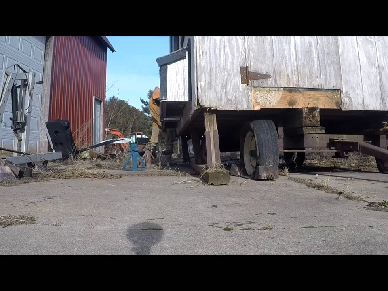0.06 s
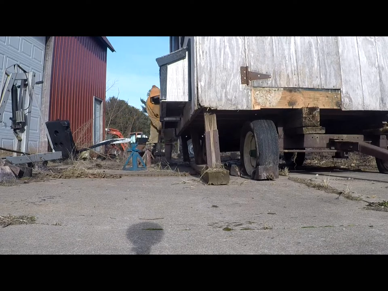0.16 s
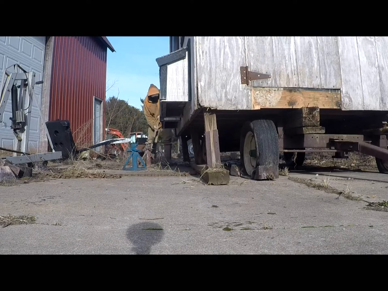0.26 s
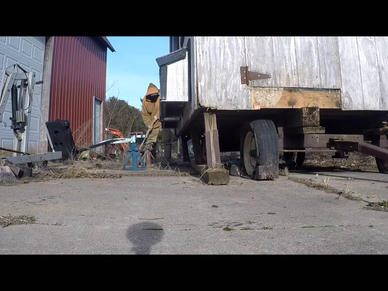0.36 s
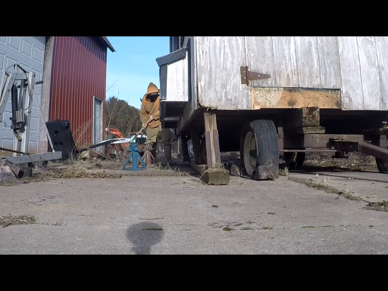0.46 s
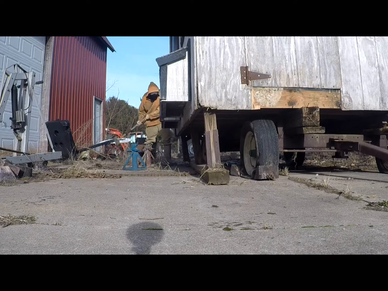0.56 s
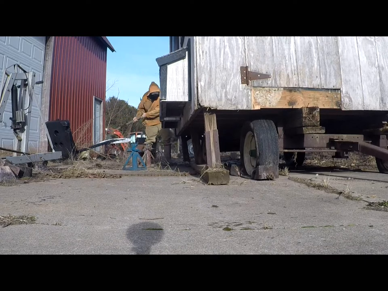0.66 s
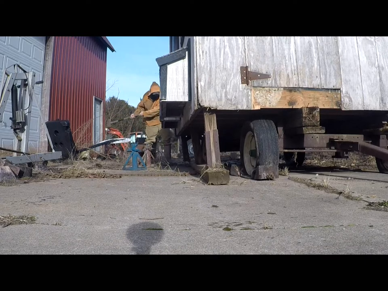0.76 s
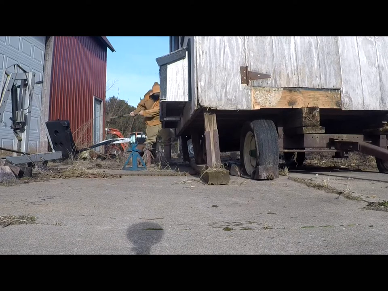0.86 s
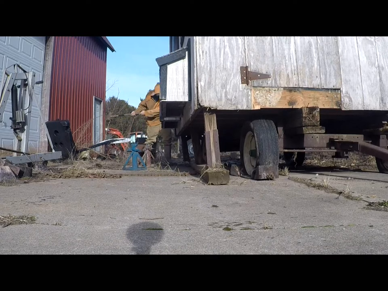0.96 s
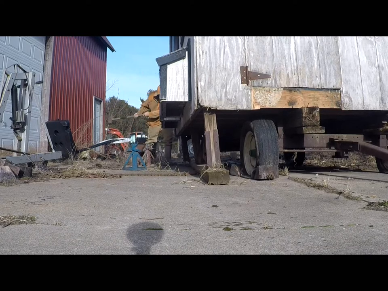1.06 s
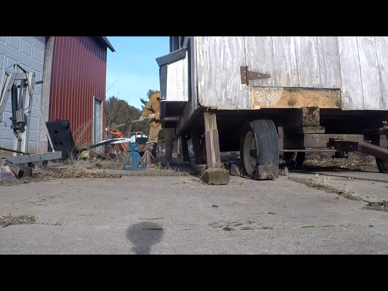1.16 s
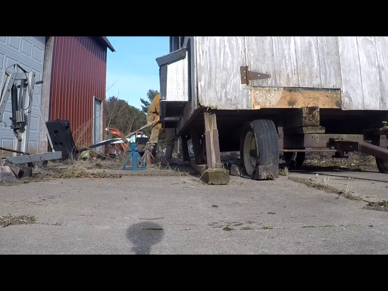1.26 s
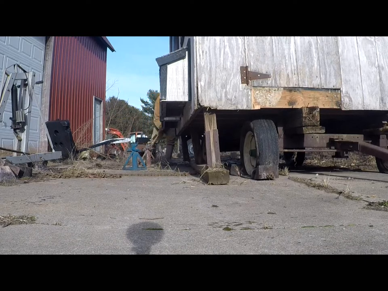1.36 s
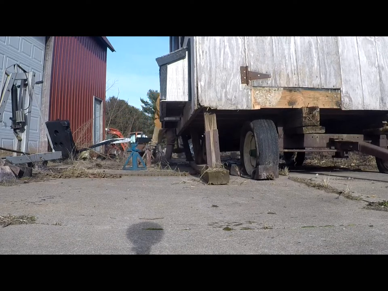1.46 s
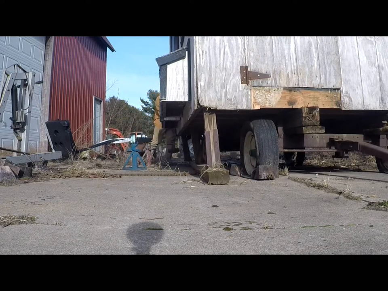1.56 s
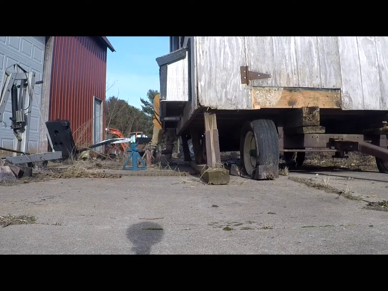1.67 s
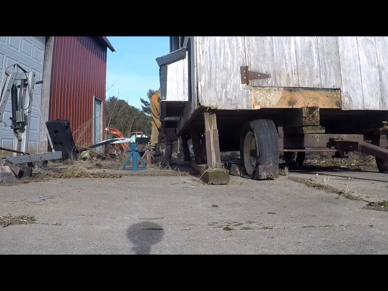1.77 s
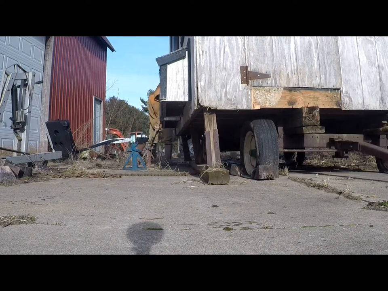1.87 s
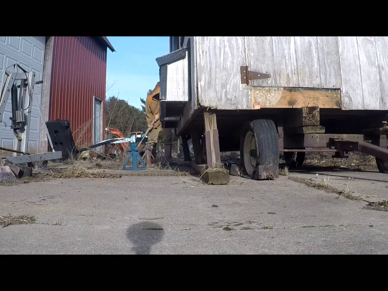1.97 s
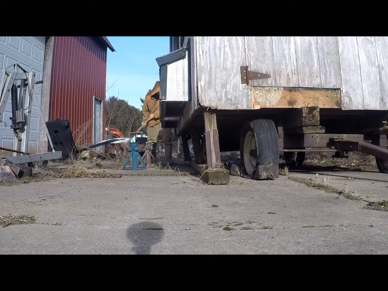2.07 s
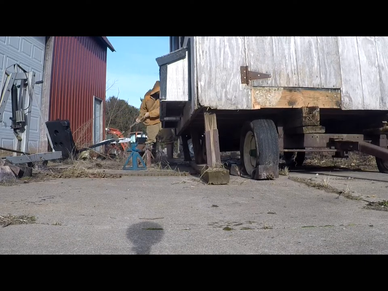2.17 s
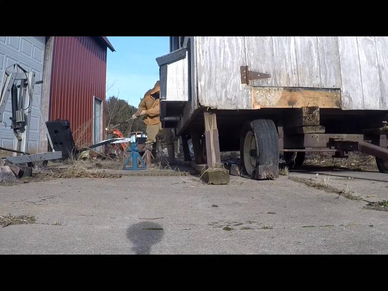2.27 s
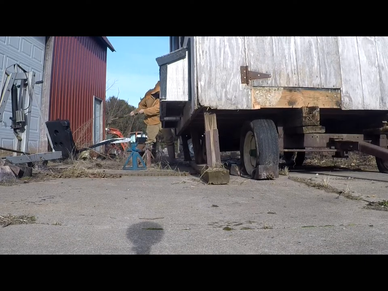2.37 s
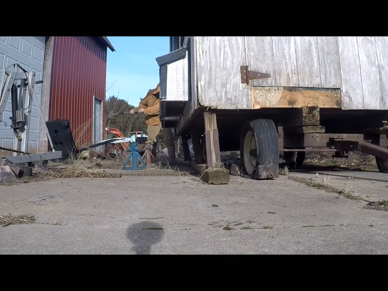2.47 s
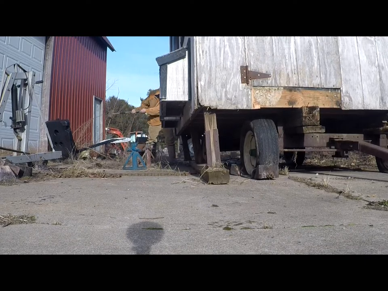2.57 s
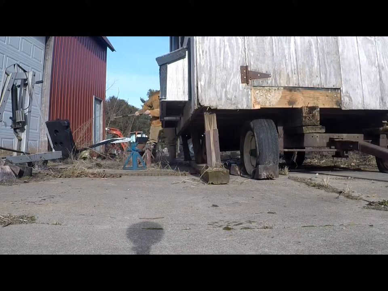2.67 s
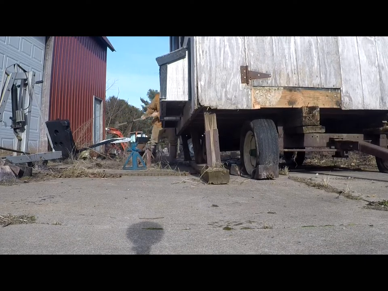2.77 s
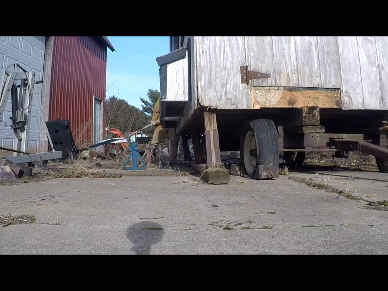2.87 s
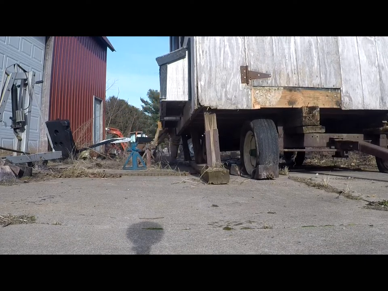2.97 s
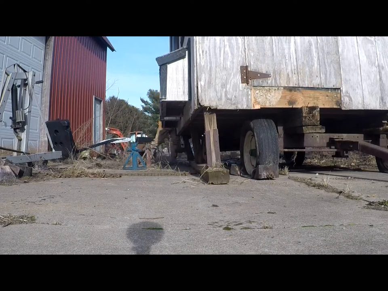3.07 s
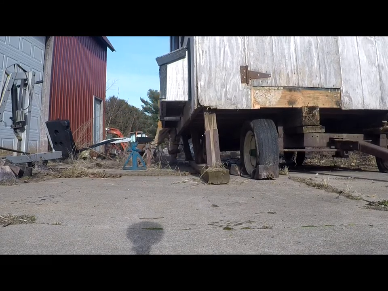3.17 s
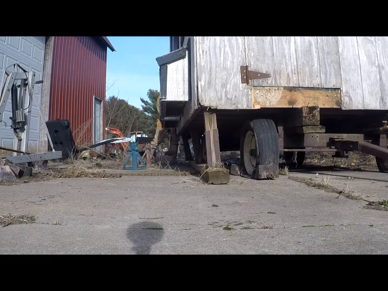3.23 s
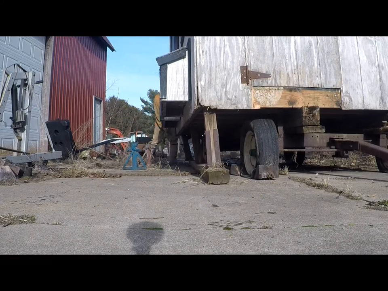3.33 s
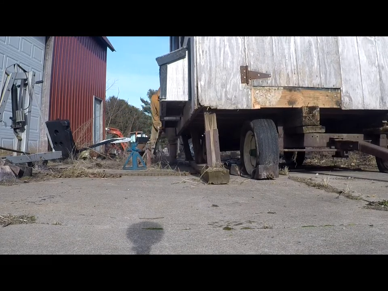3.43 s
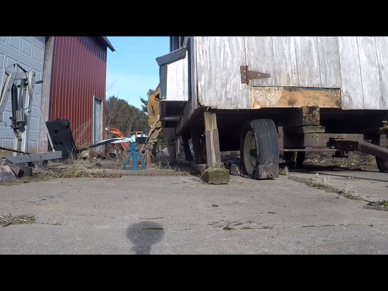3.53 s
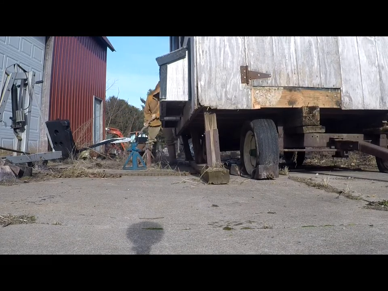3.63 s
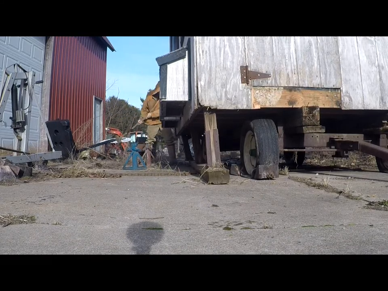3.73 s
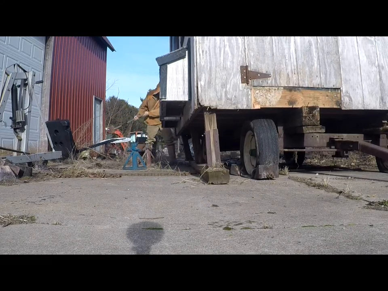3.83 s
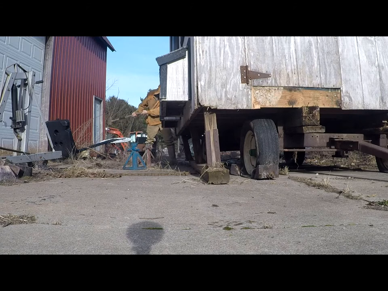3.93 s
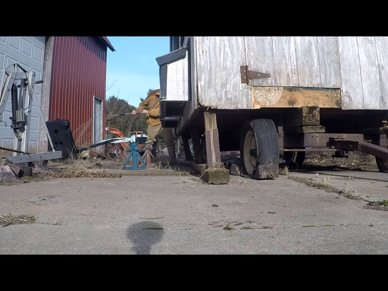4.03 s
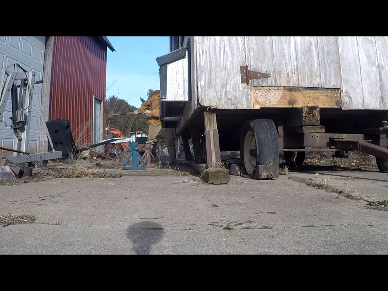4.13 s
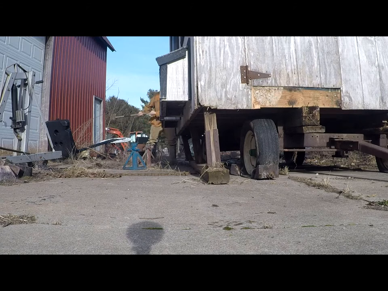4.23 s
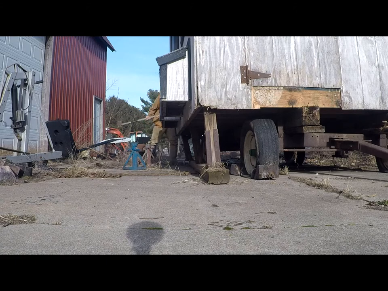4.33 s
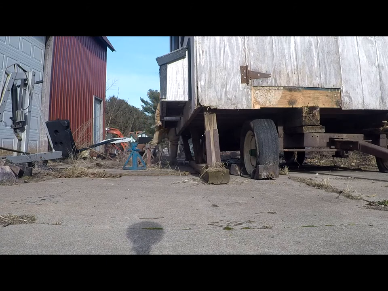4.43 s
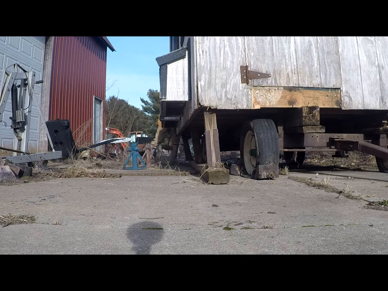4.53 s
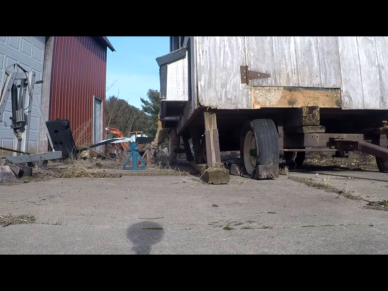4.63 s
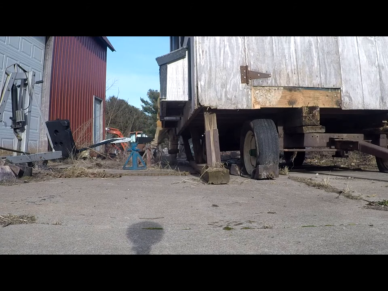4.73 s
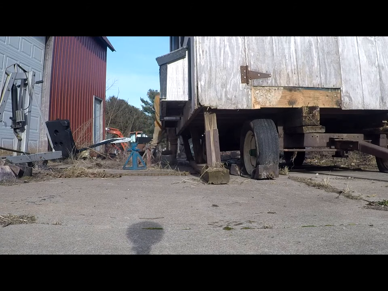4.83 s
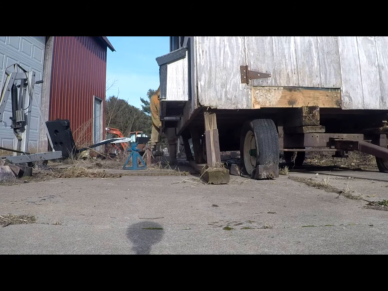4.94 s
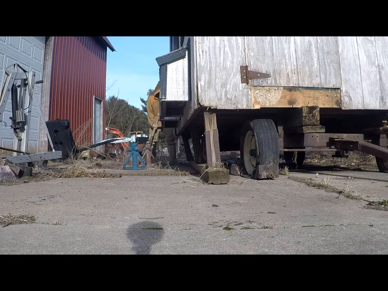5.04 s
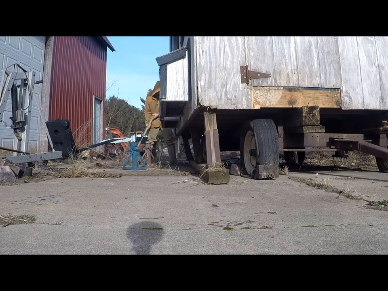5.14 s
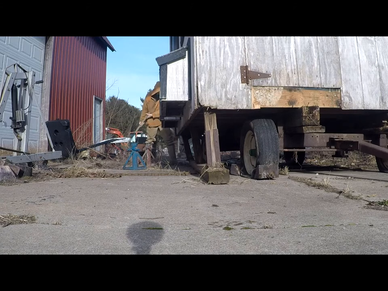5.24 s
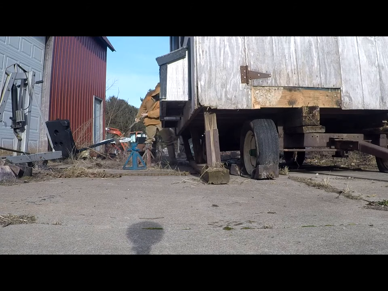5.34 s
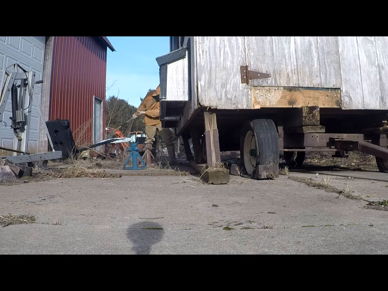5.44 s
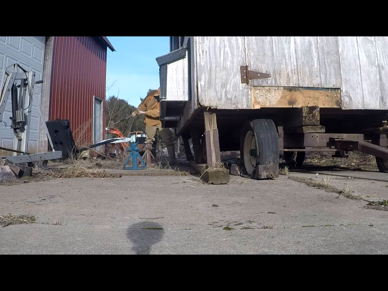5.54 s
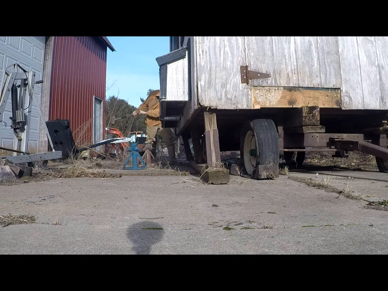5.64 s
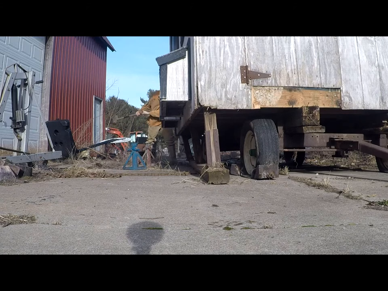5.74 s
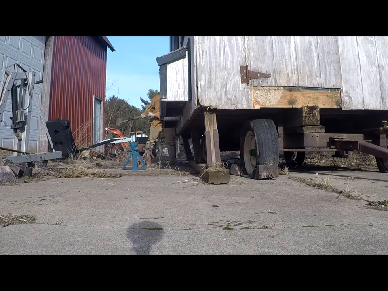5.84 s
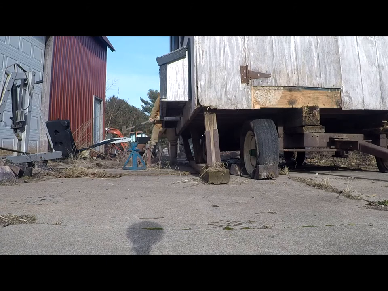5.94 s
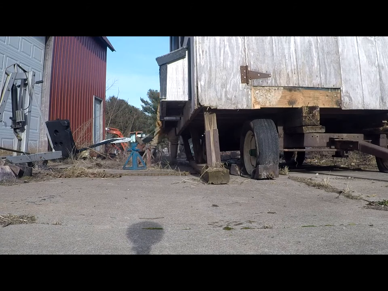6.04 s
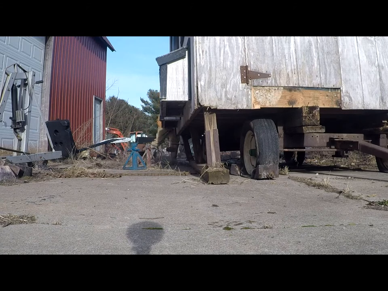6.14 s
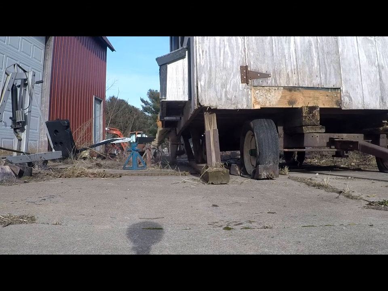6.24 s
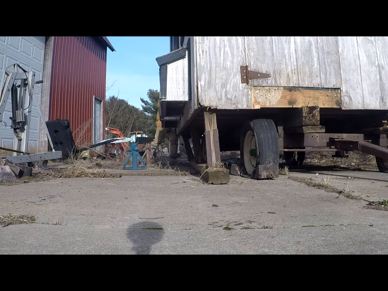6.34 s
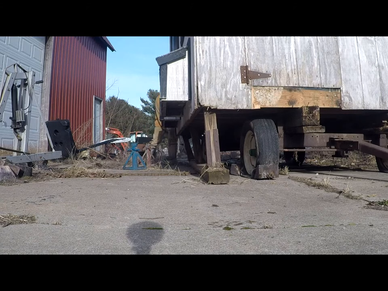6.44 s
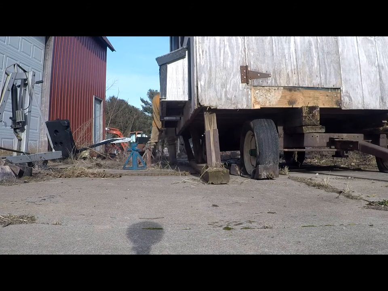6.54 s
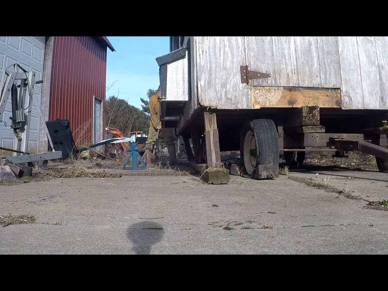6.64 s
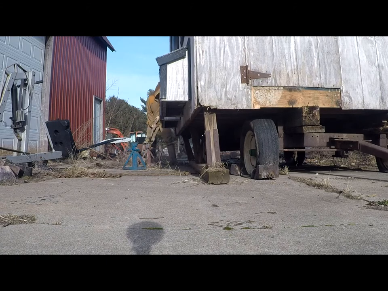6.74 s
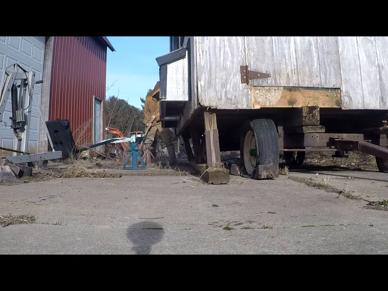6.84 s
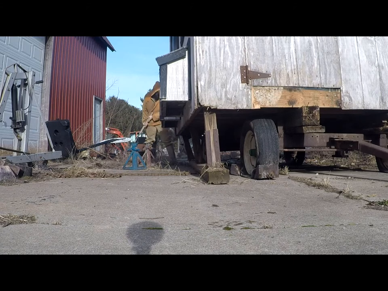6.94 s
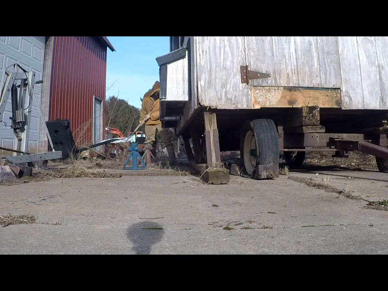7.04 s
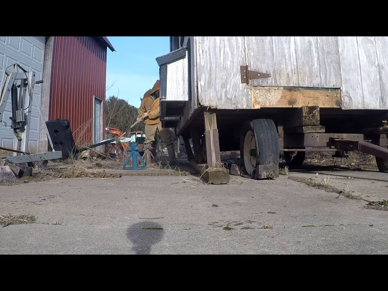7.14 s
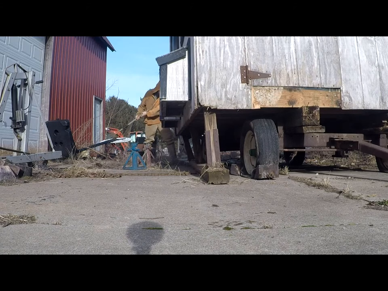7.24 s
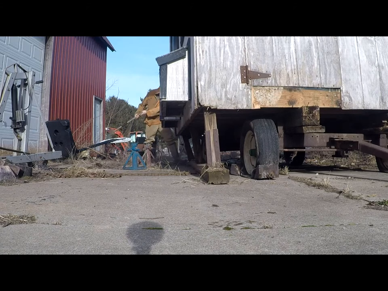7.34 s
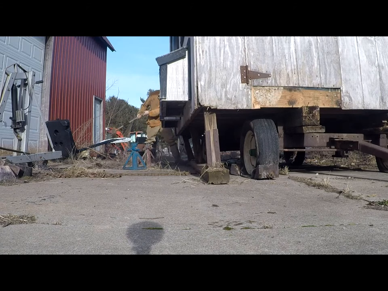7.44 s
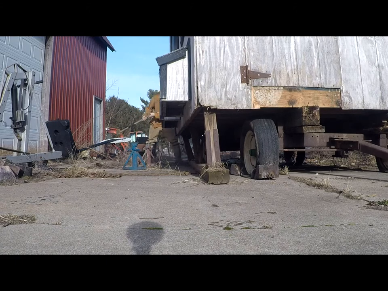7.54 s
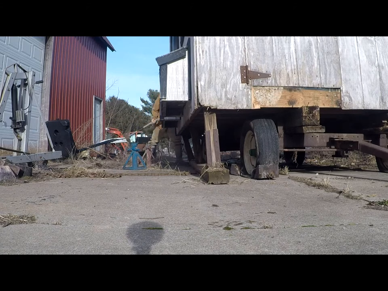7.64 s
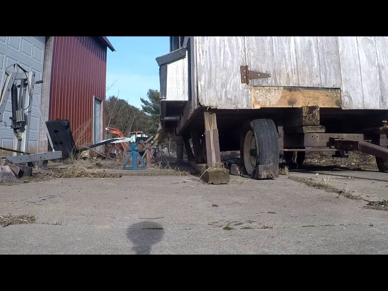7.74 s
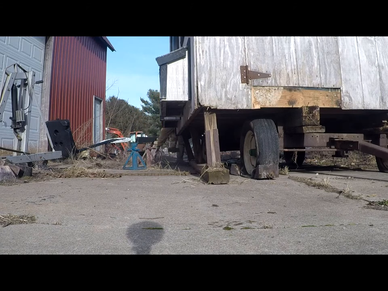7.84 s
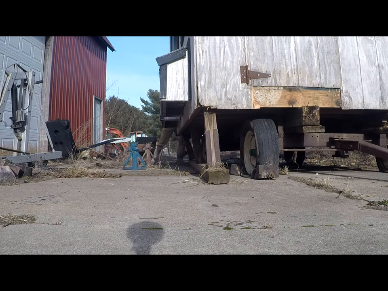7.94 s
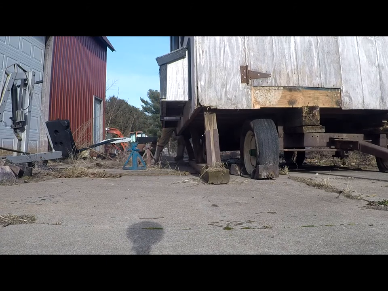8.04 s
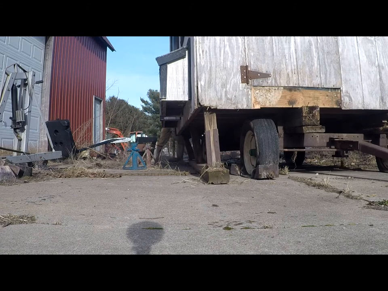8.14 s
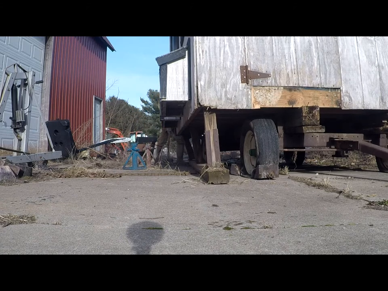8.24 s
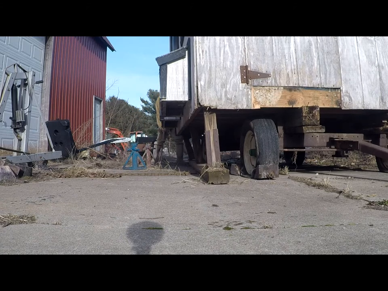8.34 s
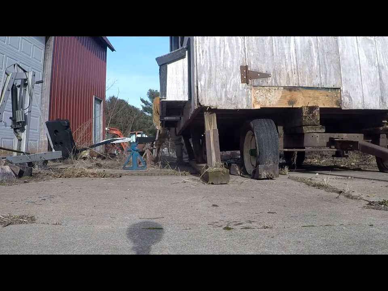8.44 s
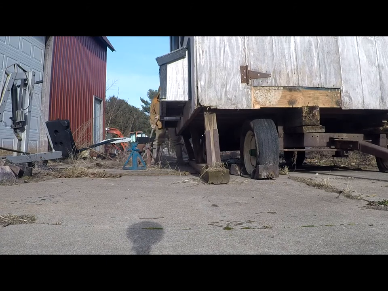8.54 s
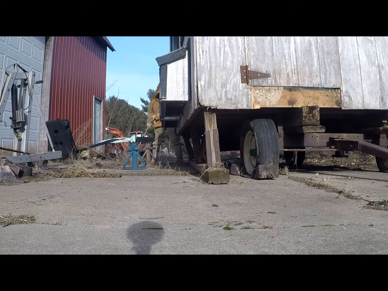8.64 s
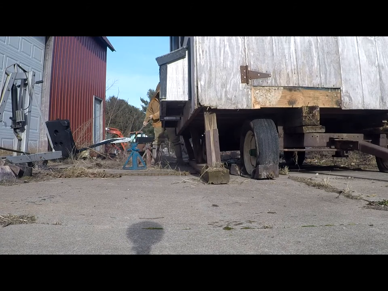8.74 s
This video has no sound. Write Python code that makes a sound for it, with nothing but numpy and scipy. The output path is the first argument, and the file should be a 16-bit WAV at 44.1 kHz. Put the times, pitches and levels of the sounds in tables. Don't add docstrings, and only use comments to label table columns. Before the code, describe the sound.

Heavy steel clanks crack and boom on timber every 1.6 seconds, very close and overloaded, with scuffs, ticks and wind between them in an open yard.

```python
import sys
import numpy as np
from scipy import signal
from scipy.io import wavfile

SR = 44100
rng = np.random.default_rng(int(sys.argv[2]) if len(sys.argv) > 2 else 0)


def boost(x):
    u = np.asarray(x, float) / 20
    return 10 ** u


def generate_wav(signal):
    frames = np.transpose(np.atleast_2d(signal))
    scaled = np.clip(frames, -1, 1) * 32767
    pcm = np.round(scaled).astype(np.int16)
    wavfile.write(sys.argv[1], SR, pcm)


N = 388080

# start in seconds, strength in dB, brightness in dB, board boom in dB, clang in dB
BLOWS = [
    (-.045, 2, -1, -5.5, -7),
    (1.544, 2, 1, 0, -1),
    (3.1268, 2.5, 0, -1.5, -1.5),
    (4.6518, 3, -1.5, -3, -1.5),
    (6.2443, 1.5, -2, 0.5, 1),
    (7.945, 3, -0.5, 1.5, -1.5),
]
# pitch in Hz, level in dB, decay by 60 dB in seconds
TIMBER_MODES = [(65.8, -9, 0.19), (97.2, -13, 0.19), (122.4, -9.5, 0.14), (161, -7.5, 0.2),
                (188.4, -8, 0.16), (220.1, -3.5, 0.3), (254, -11, 0.34), (287.2, 2.5, 0.2),
                (304.9, -1, 0.22), (342, -3.5, 0.16), (460.6, -8, 0.19), (587, -9.5, 0.21),
                (684, -10.5, 0.21), (821, -11.5, 0.22), (937, -10, 0.21), (1013, -14, 0.24),
                (1100, -12.5, 0.19), (1150, -14.5, 0.21), (1210, -16, 0.29), (1484, -16.5, 0.17),
                (1580, -16, 0.11), (2070, -19.5, .13), (2290, -22.5, 0.13), (2800, -18.5, 0.14),
                (4070, -23, 0.13), (4910, -23.5, 0.081), (6000, -25.5, 0.059)]
# pitch in Hz, level in dB per Hz
CRASH_COLOUR = [(18, -43), (30, -21), (153, -5.5), (303, -2), (394, -8), (449, -7.5), (962, -11.5),
                (1460, -15), (2230, -22), (3770, -27), (8080, -31.5), (14000, -51.5), (16000, -57)]
# pitch in Hz, decay by 60 dB in seconds
CRASH_T60 = [(60, 0.34), (160, 0.25), (420, 0.19), (1100, 0.14), (2910, 0.24), (7680, 0.17)]
LANDING_LOW_HZ = [65, 120, 160, 220, 290]
LANDING_HIGH_HZ = [350, 520, 1000, 2000, 9000]
# one blow, its gains in dB at the low and at the high pitches
LANDING_LOW_DB = [(-3, 1, 2, 4, 3), (-1, 3.5, -1, 2, -2), (4, 8, 3, 4, 0), (6, 1.5, -1.5, 1, 0),
                  (-4, 6, 0, 1, -2.5), (-2.5, -.5, -3, 0, -1)]
LANDING_HIGH_DB = [(0.5, -2.5, -1.5, -1, 1), (8, 2.5, -3, 0, 1), (1, -1, 3, -3, 2), (2, -1, -1.5, 2.5, 0),
                   (0, 0, -1, 0, 1), (3, -2, -.5, -4, 1.5)]
THUD_DB = [-8, -9, -10, -5.5, -8, -8]
# delay in seconds, level in dB
WALL_ECHOES = [(.0045, -5.5), (.0105, -13), (.0225, -11), (0.038, -23.5)]
# pitch in Hz, decay by 60 dB in seconds, beat in Hz
BAR_HZ = [7488, 11770]
BAR_T60_S = [2.5, 1.0]
BAR_BEAT_HZ = [9, 14]
# low mode in dB, high mode in dB
BAR_DB = [(-72, -66), (-69, -64), (-64, -95), (-73, -95), (-74, -95), (-62, -95)]
# start in seconds, level in dB, bright contact in dB
PIN_BOUNCES = [
    (4.740, -26, -2),
    (4.763, -40, -20),
    (4.808, -37, -5),
    (4.861, -41.5, -17),
    (5.115, -55, -15),
    (5.320, -53, -15),
    (5.528, -64, -15),
]
PIN_LANDS_ON = [0, 0, 1, 2, 3, 4, 4]
# pitch in Hz, level in dB, decay by 60 dB in seconds
PIN_FACES = [
    [(3060, -9, 0.087), (3640, -16, 0.09), (4603, 1.5, 0.1), (4570, -6, .15), (1900, -10, .2),
     (6500, -14, 0.088), (8680, 2, 0.041), (8850, -7, .18), (12150, -5, 0.13), (13900, -12, .07)],
    [(2299, -2, 0.15), (2550, 2, 0.06), (3122, -6, .07), (8550, -10, 0.096), (10800, -18, .05),
     (12110, -16, .1), (13900, -15, 0.08)],
    [(2740, -8, 0.5), (2747, -11, .4), (3440, -5, 0.15), (3830, -5, .06), (4161, -7, 0.2), (5405, -2, 0.12)],
    [(3120, -5, .25), (4597, -3, .1), (2100, -4, .06)],
    [(13950, 7, .08)],
]
# start in seconds, peak in dB, pitch in Hz
SCUFFS = [(2.095, -37.5, 385), (3.389, -46.5, 650), (3.595, -41.5, 299), (3.679, -39, 503),
          (3.895, -36, 430), (4.925, -38.5, 646), (4.999, -44.5, 1220), (5.18, -48, 1100),
          (5.06, -39.5, 630), (5.179, -51.5, 280), (5.268, -33.5, 397), (5.425, -29.5, 406),
          (6.759, -43, 479), (6.828, -33.5, 347), (7.029, -39, 444), (8.501, -37.5, 630), (8.63, -36, 520)]
# start in seconds, peak in dB, pitch in Hz
SCRAPES = [(2.975, -36, 3035), (6.845, -50, 2980), (7.72, -35.5, 2400), (7.78, -38.5, 2370)]
# start in seconds, peak in dB, pitch in Hz
SQUEAKS = [(2.985, -36, 3200), (4.532, -46, 3160), (5.588, -52, 3130), (7.285, -46, 1990),
           (7.308, -46, 2900), (7.491, -38.5, 2960), (7.762, -38.5, 3190), (8.586, -56, 3120)]
# start in seconds, peak in dB, note in Hz
TWIGS = [(2.1634, -45, 2280), (2.6774, -34, 2400), (2.706, -38, 2840), (2.226, -40, 3800),
         (2.3197, -36, 3000), (2.335, -42, 2900), (2.614, -40, 5500), (5.455, -41, 3300),
         (6.735, -50, 3200), (2.9774, -32, 3100), (3.5494, -51, 4500), (3.665, -49, 4000),
         (4.1751, -33, 3900), (4.2632, -39, 3100), (4.5344, -44, 3140), (5.229, -42.5, 1960),
         (5.4744, -37, 4000), (5.5904, -44, 2660), (5.7668, -36.5, 2770), (6.6487, -51.5, 4500),
         (6.793, -39, 4200), (6.9195, -37, 3300), (7.0648, -46, 5430), (8.571, -44, 6000),
         (8.5877, -33, 3020), (8.6484, -44, 7800), (8.7233, -38, 4000)]
# start in seconds, peak in dB, note in Hz
GRIT = [(0.7215, -35, 5320), (1.3531, -17, 6500), (1.8408, -56, 12000), (1.9824, -52, 8280),
        (2.0762, -41, 8330), (.102, -44, 8500), (.345, -59, 12000), (.4609, -53, 8700), (.56, -52, 9200),
        (.648, -52, 8200), (1.753, -50, 11000), (2.1191, -51, 8260), (2.161, -48, 8020), (2.19, -47, 6230),
        (2.2603, -44, 7380), (2.985, -42, 7960), (3.405, -56, 8800), (3.5, -58, 8000), (3.552, -56, 8500),
        (3.62, -56, 8500), (6.872, -50, 8000), (7.3652, -40, 5960), (7.7354, -36, 8130),
        (7.7753, -39, 6070), (2.2175, -34, 8700), (2.307, -39, 9050), (2.319, -30, 7550),
        (2.3687, -40, 7000), (2.7644, -34, 7500), (3.7996, -45, 6500), (3.818, -42, 8720),
        (3.928, -44, 8000), (5.2034, -52, 8000), (5.4518, -36, 8400), (7.428, -31, 7200),
        (7.709, -33.5, 6960), (8.2816, -40.5, 9100), (8.318, -46, 3100), (8.3884, -49, 3480),
        (8.425, -38.5, 7980), (8.493, -40, 8500)]
# start in seconds, peak in dB, note in Hz
KNOCKS = [(2.26, -40, 1890), (2.9724, -35, 3120), (3.7186, -44.5, 940), (4.4758, -33, 1600),
          (4.4933, -33.5, 1810), (5.1414, -49.5, 991), (5.802, -35.5, 1850), (6.0791, -33.5, 926),
          (6.7035, -43.5, 1942), (6.7448, -38.5, 1300), (6.772, -44, 1400), (5.073, -48, 1750),
          (2.716, -40, 2900), (6.9443, -37.5, 1940), (7.734, -36.5, 1500), (8.778, -36, 1800),
          (4.1762, -37, 2600)]
# snap in dB, note in dB, woody knock in dB, bright spit in dB
TICK_KINDS = [
    (2.5, 1, -11.5, -12),
    (2.5, 1, -14.5, 0),
    (-10, 9, -7.5, -21),
]
# middle in seconds,
# length in seconds, dB over the yard, pitch in Hz
STIRS = [(0.412, 0.097, 1.5, 97.2), (0.744, 0.35, 3.5, 4200), (1.2, .25, 1, 1700), (1.252, 0.29, 5, 450),
         (2.25, 0.11, 8.5, 6000), (2.278, 0.19, 7.5, 406), (3.05, .06, 5, 90), (3.81, 0.15, 9, 400),
         (4.0, 0.16, 4.5, 280), (4.138, 0.2, 4.5, 90), (4.49, 0.099, 3.5, 1500), (4.7, 0.081, 7.5, 463),
         (5.1, 0.13, 3.5, 90), (5.306, 0.055, 9, 390), (5.3, .06, 2.5, 800), (5.4, 0.096, 4.5, 150),
         (5.42, .06, 2.5, 7000), (5.446, 0.045, 4.5, 700), (5.51, 0.099, 8.5, 310), (6.544, 0.048, 9, 540),
         (6.738, 0.06, 9, 370.4), (6.81, 0.061, 13.5, 890), (6.8, 0.066, 4.5, 6000), (7.6, 0.06, 2, 500),
         (6.95, 0.033, 8, 1800), (7.037, 0.12, 12.5, 320), (7.188, 0.078, 5.5, 258), (7.3, .06, 2.5, 300),
         (7.477, .12, 9.5, 5100), (7.6, 0.35, 2.5, 14000), (7.74, 0.044, 4, 8000), (7.8, 0.14, 7, 2210),
         (7.918, 0.041, 19.5, 442.8), (8.3, 0.12, 14.5, 6880), (8.398, .03, 6, 3020),
         (8.47, 0.059, 6, 8000), (8.52, .03, 3, 1500), (8.597, 0.087, 11.5, 430), (8.62, 0.034, 5, 3456),
         (8.78, .08, 15.5, 360)]
# start in seconds, end in seconds, first pitch in Hz, last pitch in Hz, level in dB
CHIRPS = [
    (4.077, 4.155, 5010, 4980, -54.5),
    (4.205, 4.245, 4480, 4240, -50),
]
# time in seconds, firing rate in Hz, second, half and first order in dB
ENGINE = [(0, 97, -48, -55, -37), (.17, 96, -43.5, -51, -35), (.25, 95.5, -40.5, -52, -48),
          (.4, 95, -36, -52, -31), (.55, 94, -40, -50, -45.5), (.75, 92.6, -40, -52, -42.5),
          (.95, 92.5, -45, -38, -52), (1.15, 92.5, -47, -33.5, -40), (1.5, 92, -45.5, -33.5, -45),
          (2.0, 90, -50.5, -58, -52.5), (2.6, 87, -46.5, -54, -51), (2.9, 85, -46.5, -51, -41.5),
          (3.5, 84.5, -53.5, -57.5, -49.5), (5.5, 84, -57, -62.5, -59.5), (7, 86, -56.5, -64, -55),
          (7.8, 87, -54, -58, -49.5), (8.8, 87, -55, -61, -57)]
# time in seconds, level in dB
TRAFFIC = [(0, 7.5), (.6, 10), (1.3, 11), (2.0, 5), (3.0, 5), (4.0, -1.5), (5.5, -1), (7.0, -1),
           (8.8, -0.5)]
# pitch in Hz, level in dB per Hz
YARD_COLOUR = [(15, -30), (25, -0.5), (33, -8.5), (92, -11.5), (117, -8.5), (185, -12), (326, -17),
               (695, -22), (3080, -33.5), (4740, -39), (7310, -40.5), (14800, -46.5), (16000, -62)]
YARD_EDGES_HZ = [30, 230, 700, 3000, 15500]
# open level in dB, shut by in dB, share of traffic, share of gusts
LAYERS = [
    (-45, -1.5, 0.45, 0.12),
    (-51.5, -9, 0.72, 0.0041),
    (-47, -22, 1.025, 0.),
    (-51.5, -23.5, 0.12, 0.044),
]
# time in seconds, level in dB
GUSTS = [(0.0, -44.5), (0.4, -46), (1.2, -44), (1.5, -35.5), (2.0, -48), (2.5, -41), (3.6, -52.5),
         (4.05, -33), (4.38, -32), (4.6, -45), (5.2, -41), (5.6, -29), (6.0, -30.5), (6.4, -40.5),
         (7.1, -33), (7.3, -25), (7.85, -25), (8.4, -43), (8.8, -30.5)]
# middle in seconds, peak in dB, half length in seconds
SHOVES = [(1.75, -41, .3), (3.1, -37, .06), (4.52, -38, .06), (5.3, -37, .05), (5.51, -28, .05),
          (5.62, -29, .03), (5.79, -22, .06), (5.96, -27, .06), (6.19, -27, .06), (6.48, -39, .08),
          (6.76, -32, .04), (6.93, -32, .035), (7.12, -31, .05), (7.34, -21, .05), (7.49, -16.5, .07),
          (7.84, -20, .1), (8.74, -23, .05)]
# middle in seconds, peak in dB, half length in seconds
SUCKS = [(.95, -37, .1), (1.44, -29, .13), (2.58, -32, .15), (4.14, -26, .1), (4.35, -27, .1),
         (5.17, -31, .09), (5.42, -24, .04), (5.67, -30, .03), (6.07, -34, .04), (6.65, -27, .06),
         (6.85, -29, .035), (7.02, -30, .035), (7.24, -22, .04), (7.64, -22, .05), (8.14, -35, .1),
         (8.52, -28, .07)]

TAIL = 1.01
HEAVE_HZ, HEAVE_DB, HEAVE_T60_S = 29, -21, .35
CLANG_SPREAD_DB, FLICKER_DB, STIR_OCTAVES = 2.5, 1.2, 1
SQUEAK_RISE_S, SQUEAK_T60_S, SQUEAK_SAG = 0.0024, 0.12, 2.2
TICK_CLICK_DB, TICK_PURE_DB = 5, -13
DUCK_DB, DUCK_BACK_S, DUCK_AHEAD_S, DUCK_FALL_S = -18, 0.061, .018, .007
SHUT_S, CREEP_S, SHUT_AT_ONCE = .36, 0.45, 0.94
OVERLOAD_TOP, CUTOFF_HZ = 0.94, 15800


def at_hz(points, hz):
    points_hz, values = np.array(points)[:, 0], np.array(points)[:, 1]
    return np.interp(np.log(hz), np.log(points_hz), values)


def in_time(rows):
    s, *columns = np.transpose(rows)
    return [np.interp(np.arange(N) / SR, s, column) for column in columns]


def rms_one(x):
    return x / np.sqrt(np.mean(x ** 2) + 1e-20)


def band(x, low_hz, high_hz):
    sos = signal.butter(2, [low_hz, min(high_hz, .45 * SR)], "band", fs=SR, output="sos")
    return signal.sosfilt(sos, x)


def drift(rate_hz):
    knots = rng.standard_normal(int(N / SR * 40) + 2)
    return np.interp(np.arange(N) / SR * min(rate_hz, 39), np.arange(len(knots)), knots)


def dying(t, t60):
    return boost(-60 * t / t60)


def add(out, piece, s):
    i = round(s * SR)
    piece = piece[max(-i, 0):N - i]
    out[max(i, 0):max(i, 0) + len(piece)] += piece


def struck(modes, t, spread_db, detune, build):
    out = np.zeros(len(t))
    for hz, db, t60 in modes:
        strength, off_pitch = rng.standard_normal(2)
        envelope = dying(t, t60) * (1 - np.exp(-t * hz / build))
        out += boost(db + spread_db * strength) * envelope * np.sin(2 * np.pi * hz * t * (1 + detune * off_pitch))
    return out


def crash(t, white, bright_db, landing):
    out, edges = np.zeros(len(t)), 30 * 2 ** np.arange(0, 9.2, 1 / 3)
    for k, (low, high) in enumerate(zip(edges, edges[1:])):
        hz = np.sqrt(low * high)
        tilt_db = bright_db * np.log2(hz / 1000) / 3 + at_hz(landing, hz)
        rise = 1 - np.exp(-t * hz / 0.47)
        shape = dying(t, TAIL * at_hz(CRASH_T60, hz))
        shape += boost(11) * dying(t, 0.044) * min(hz / 2000, 1)
        shape += boost(-21.0) * dying(t, 0.49)
        out += boost(at_hz(CRASH_COLOUR, hz) + tilt_db) * rise * shape * band(white[k % 2], low, high)
    return out


def crack(t, white, bright_db):
    low = boost(bright_db) * band(white[1] * dying(t, .006), 6200, 10000)
    return low + boost(bright_db - 9) * band(white[0] * dying(t, .008), 11500, 15000)


def contact(t, bright_db, clang_db):
    knock = boost(clang_db - 4) * np.sin(2 * np.pi * 1050 * t) * dying(t, 0.043)
    ping = boost(bright_db - 6) * np.sin(2 * np.pi * 7900 * t) * dying(t, 0.011)
    heave = boost(HEAVE_DB) * np.sin(2 * np.pi * HEAVE_HZ * t) * dying(t, HEAVE_T60_S)
    return knock + ping + heave


def ground_thud(t, white, thud_db):
    fade = dying(np.maximum(t - .009, 0), 0.018)
    push = np.clip(t / .006 - .15, 0, 1) ** 1.5 * np.sin(2 * np.pi * 205 * (t - .001))
    rasp = np.minimum(t / .008 + .08, 1) * band(band(white[0], 400, 4500), 300, 6000)
    return fade * (boost(-21) * rasp - boost(thud_db) * push)


def blows():
    out, t = np.zeros(N), np.arange(SR * 2 // 5) / SR
    landings = zip(BLOWS, LANDING_LOW_DB, LANDING_HIGH_DB, THUD_DB)
    for (s, db, bright_db, boom_db, clang_db), lows, highs, thud_db in landings:
        white = rng.standard_normal((2, len(t)))
        landing = list(zip(LANDING_LOW_HZ + LANDING_HIGH_HZ, lows + highs))
        modes = [(hz, mode_db + at_hz(landing, hz), t60) for hz, mode_db, t60 in TIMBER_MODES]
        boards = [mode for mode in modes if mode[0] < 500]
        bar = [mode for mode in modes if mode[0] > 500]
        boom = boost(boom_db - 7.5) * struck(boards, t / TAIL, spread_db=1.06, detune=.016, build=1.3)
        clang = boost(clang_db - 11.0) * struck(bar, t, spread_db=CLANG_SPREAD_DB, detune=0.0046, build=0.4)
        direct = boost(12.5) * crash(t, white, bright_db, landing) + boom + clang
        first = boost(2.5) * crack(t, white, bright_db) + contact(t, bright_db, clang_db)
        add(out, boost(db) * (direct + first), s)
        spread = white[0] * dying(t, .03) * np.minimum(t / .003, 1)
        smeared = boost(bright_db - 6) * band(spread, 3000, 11000)
        returned = band(smeared + direct * dying(t, 0.032), 260, 11000)
        for lag, echo_db in WALL_ECHOES:
            add(out, boost(db + echo_db) * returned, s + lag)
        add(out, boost(db) * ground_thud(t, white, thud_db), s - .009)
    return out


def bar_ring():
    out, t = np.zeros(N), np.arange(SR) / SR
    let_go = np.clip((.75 - t) / .15, 0, 1)
    for (s, *_), levels_db in zip(BLOWS, BAR_DB):
        for db, hz, t60, beat in zip(levels_db, BAR_HZ, BAR_T60_S, BAR_BEAT_HZ):
            twin = .45 * np.sin(2 * np.pi * ((hz + beat) * t + rng.random()))
            pair = np.sin(2 * np.pi * hz * t) + twin
            add(out, boost(db) * pair * dying(t, t60) * let_go, s)
    return out * boost(3 * drift(30))


def pin():
    out, t = np.zeros(N), np.arange(SR // 2) / SR
    for (s, db, contact_db), face in zip(PIN_BOUNCES, PIN_LANDS_ON):
        clink = struck(PIN_FACES[face], t, spread_db=0.5, detune=0, build=2.2)
        rattle = 1 + .4 * rms_one(band(rng.standard_normal(len(t)), 30, 350))
        puff = band(rng.standard_normal(len(t)) * dying(t, 0.17), 1200, 6300)
        touch = band(rng.standard_normal(len(t)) * dying(t, 0.023), 2500, 15000)
        puff += boost(contact_db) * touch
        add(out, boost(db) * (boost(-3.5) * clink * rattle + boost(-1.0) * puff), s)
    return out


def scuffs():
    out, t = np.zeros(N), np.arange(SR // 4) / SR
    envelope = (1 - np.exp(-(t / .014) ** 2)) * dying(t, 0.21)
    for s, db, hz in SCUFFS + SCRAPES:
        grainy = rng.standard_normal(len(t)) ** 5
        puff = rms_one(band(grainy, hz / 1.8, hz * 1.36))
        add(out, boost(db - 1.5) * puff * envelope, s - .01)
    return out


def squeaks():
    out, t = np.zeros(N), np.arange(SR // 10) / SR
    envelope = (1 - np.exp(-t / SQUEAK_RISE_S)) * dying(t, SQUEAK_T60_S)
    for s, db, hz in SQUEAKS:
        rough = 1 + .8 * rms_one(band(rng.standard_normal(len(t)), 40, 300))
        note = np.sin(2 * np.pi * hz * t * (1 - SQUEAK_SAG * t / 2)) * rough
        add(out, boost(db) * note * envelope, s)
    return out


def ticks():
    out, t = np.zeros(N), np.arange(SR // 16) / SR
    for events, (snap_db, note_db, knock_db, bright_db) in zip((TWIGS, GRIT, KNOCKS), TICK_KINDS):
        for s, db, hz in events:
            white = rng.standard_normal((2, len(t))) * (1 - np.exp(-t / 0.0006))
            white[:, 3] += boost(TICK_CLICK_DB)
            snap = boost(snap_db) * band(white[0] * dying(t, 0.011), 1430, 6000)
            spit = boost(bright_db - 1.0) * band(white[1] * dying(t, 0.0063), 4800, 15000)
            knock = boost(knock_db + 9.5) * band(white[1] * dying(t, 0.088), 980, 2540)
            note = band(white[0] * dying(t, .022), hz / 1.12, hz * 1.12)
            pure = np.sin(2 * np.pi * hz * t) * dying(t, .016) * np.minimum(t / .0006, 1)
            note += boost(TICK_PURE_DB) * pure
            add(out, boost(db) * (snap + spit + knock + boost(note_db) * note), s)
    return out


def bird():
    out = np.zeros(N)
    for start, end, first_hz, last_hz, db in CHIRPS:
        u = np.linspace(0, 1, round((end - start) * SR))
        tone = np.sin(2 * np.pi * np.cumsum(first_hz + (last_hz - first_hz) * u) / SR)
        swell = np.sin(np.pi * u) ** .6 * (1 + 0.41 * np.sin(13 * u))
        add(out, boost(db) * tone * swell, start)
    return out


def engine():
    hz, second_db, half_db, first_db = in_time(ENGINE)
    turns = np.cumsum(hz * (1 + .002 * drift(6))) / SR
    out = np.zeros(N)
    for order, db in [(.5, half_db), (1, first_db), (1.5, second_db - 8), (2, second_db)]:
        out += boost(db + 0.95 * drift(6.0)) * np.sin(2 * np.pi * order * turns)
    return out


def stirring_db(hz):
    t = np.arange(0, N, 64) / SR
    lift = np.zeros(len(t))
    for s, length, db, at in STIRS:
        octaves_off = np.log2(hz / at) / STIR_OCTAVES
        lift += db * np.exp(-((t - s) / length) ** 2 - octaves_off ** 2)
    return np.repeat(lift, 64)[:N]


def shut():
    t, starts = np.arange(N) / SR, np.array(BLOWS)[:, 0]
    since = t - starts[np.searchsorted(starts, t) - 1]
    closing = np.interp(since, [0, .09, SHUT_S], [0, SHUT_AT_ONCE, 1])
    return closing * np.exp(-np.maximum(since - SHUT_S, 0) / CREEP_S)


def yard_levels():
    held, traffic_db, gust_db = shut(), in_time(TRAFFIC)[0], in_time(GUSTS)[0]
    gust_swing_db = gust_db - gust_db.mean()
    return [db + shut_db * held + road * traffic_db + gusty * gust_swing_db
            for db, shut_db, road, gusty in LAYERS]


def yard():
    edges, layers = np.geomspace(29, 17000, 21), np.array(YARD_EDGES_HZ)
    fine = np.arange(layers[0], layers[-1])
    usual_db = []
    for low, high in zip(layers, layers[1:]):
        inside = fine[(fine >= low) & (fine < high)]
        usual_db.append(10 * np.log10(np.sum(boost(2 * at_hz(YARD_COLOUR, inside)))))
    lift_db = np.array(yard_levels()) - np.array(usual_db)[:, None]
    white, together, out = rng.standard_normal((2, N)), drift(22), np.zeros(N)
    grain_size = np.minimum(rng.exponential(4.0, N), 14)
    grains = rms_one(1 + .5 * (rng.random(N) < 400 / SR) * grain_size)
    numbers = np.arange(len(lift_db))
    for k, (low, high) in enumerate(zip(edges, edges[1:])):
        hz = np.sqrt(low * high)
        place = np.interp(np.log(low * high), np.log(layers[1:] * layers[:-1]), numbers)
        share = np.clip(1 - np.abs(place - numbers), 0, 1)
        db = at_hz(YARD_COLOUR, hz) + share @ lift_db + stirring_db(hz)
        db = db + FLICKER_DB * drift(22) + 0.46 * together
        out += boost(db) * band(white[k % 2] * grains, low, high)
    return boost(0.63) * np.sqrt(SR / 2) * out


def wind():
    t = np.arange(0, N + 64, 64) / SR
    swings = np.zeros(len(t))
    for sign, rows in ((1, SHOVES), (-1, SUCKS)):
        for s, db, half in rows:
            swings += sign * boost(db) * np.exp(-((t - s) / half) ** 2)
    flutter = rms_one(band(rng.standard_normal(N + SR), 6.5, 24)[SR:])
    return np.interp(np.arange(N) / SR, t, swings) + boost(in_time(GUSTS)[0] - 16) * flutter


def ducking():
    t = np.arange(0, N, 8) / SR - np.array(BLOWS)[:, :1]
    fall = np.clip((t + DUCK_AHEAD_S) / DUCK_FALL_S, 0, 1)
    drop = fall * np.exp(-np.maximum(t, 0) / DUCK_BACK_S)
    return np.repeat(boost(DUCK_DB * drop.sum(axis=0)), 8)[:N]


def scene():
    struck_sounds = blows() + bar_ring() + pin()
    worker = scuffs() + squeaks() + ticks()
    background = bird() + engine() + yard() + wind()
    return (struck_sounds + ducking() * (worker + background))[None]


def roll_off(x):
    return signal.sosfilt(signal.butter(12, 16500, fs=SR, output="sos"), x)


def record(dry):
    clipped = dry / (1 + np.abs(dry / OVERLOAD_TOP) ** 6) ** (1 / 6)
    top_cut = signal.cheby2(16, 45, CUTOFF_HZ, fs=SR, output="sos")
    return roll_off(signal.sosfilt(top_cut, clipped))


dry = scene()
out = record(dry)
generate_wav(out)
```